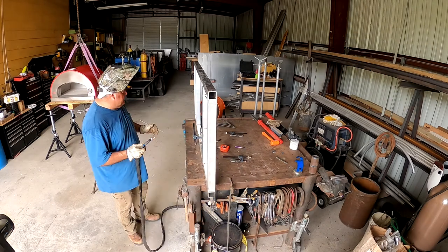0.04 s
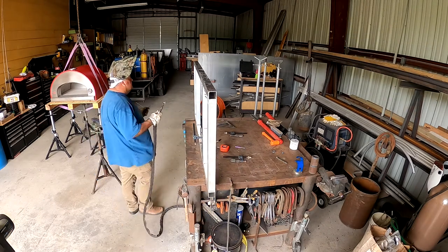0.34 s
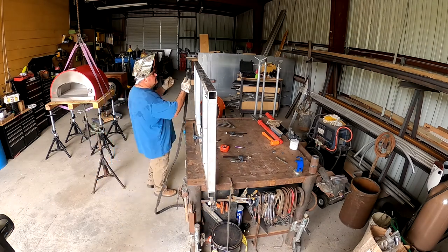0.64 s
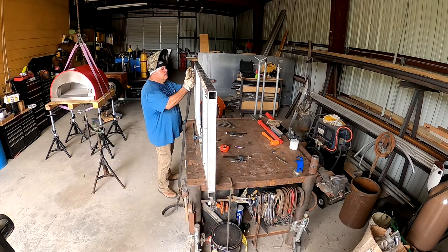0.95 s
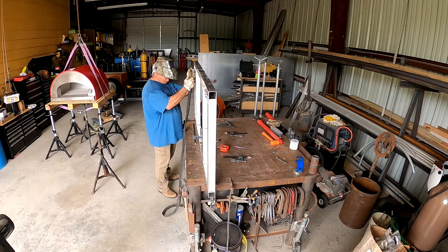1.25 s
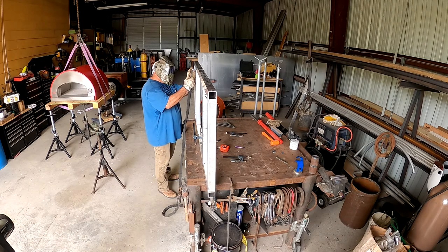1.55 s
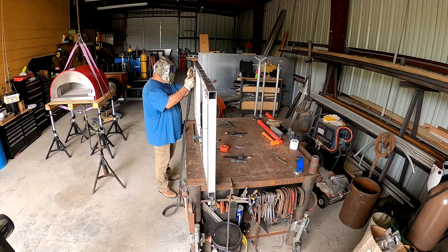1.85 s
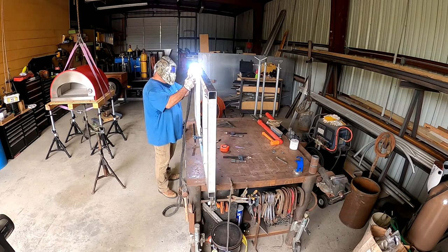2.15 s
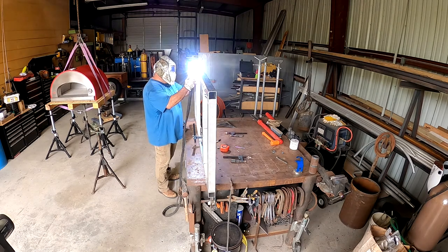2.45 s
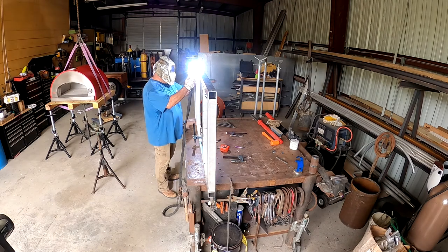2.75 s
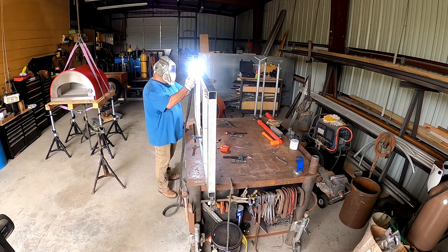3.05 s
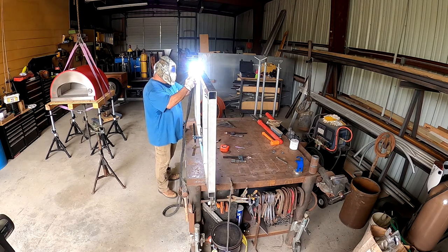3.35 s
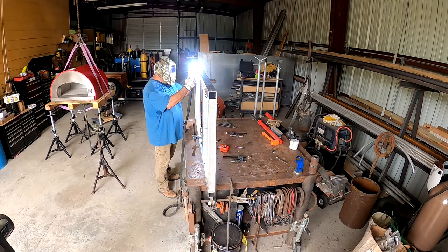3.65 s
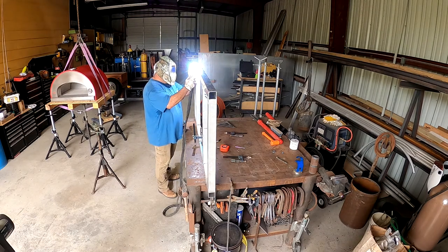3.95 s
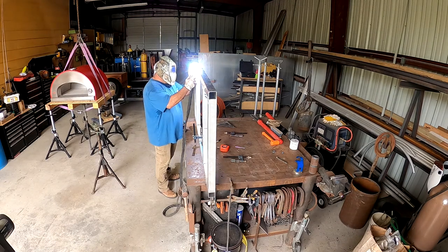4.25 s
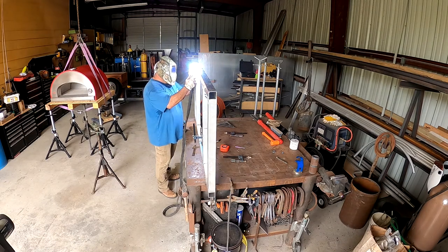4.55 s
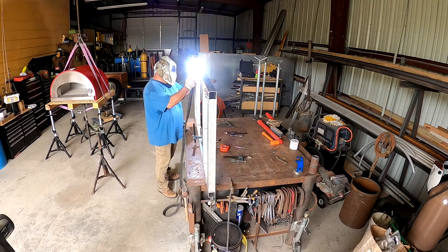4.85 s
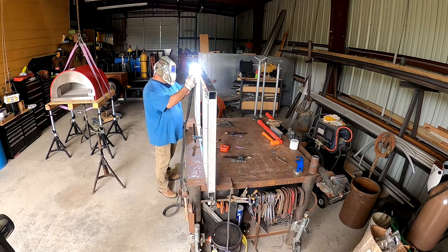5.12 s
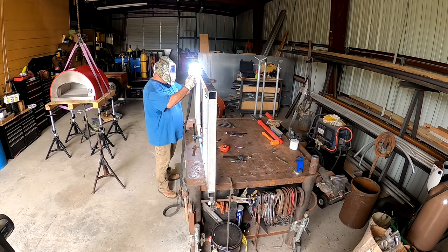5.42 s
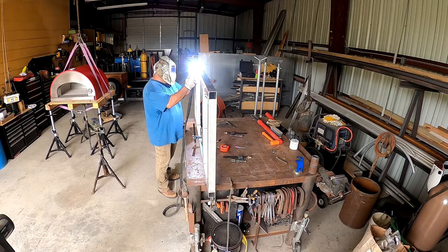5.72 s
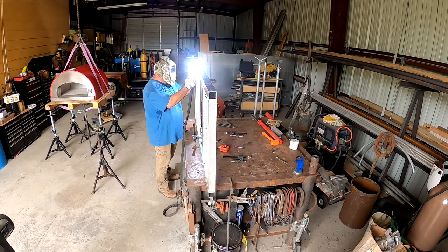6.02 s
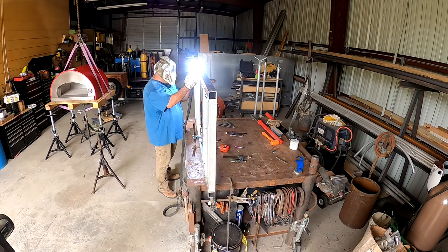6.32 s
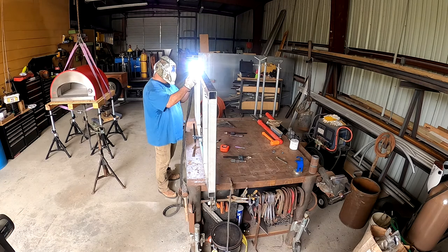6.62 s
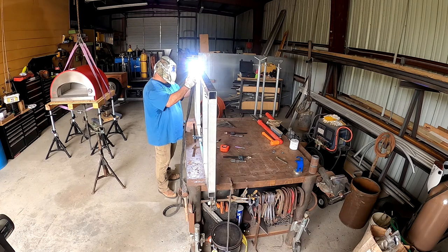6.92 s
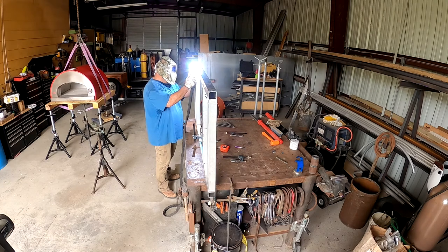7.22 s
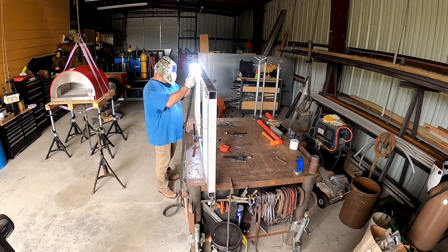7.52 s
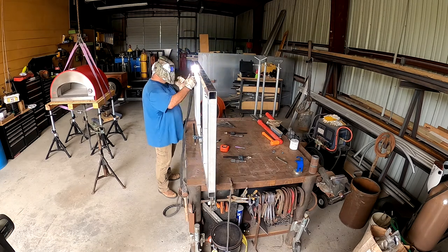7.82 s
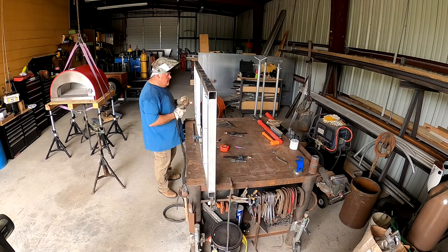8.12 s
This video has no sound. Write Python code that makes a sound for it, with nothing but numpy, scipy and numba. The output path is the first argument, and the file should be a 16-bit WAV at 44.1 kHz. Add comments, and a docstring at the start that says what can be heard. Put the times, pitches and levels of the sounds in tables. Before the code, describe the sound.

Machine fans drone, gas hisses softly, and a welding arc buzzes and sizzles steadily on metal for about six seconds.

```python
"""A bright, sizzling buzz over droning fans: AC TIG welding on a metal frame in a steel shed.
Shielding gas hisses, the arc strikes small and swells with the pedal; each polarity cycle pumps the
plasma and blasts off oxide. Echoes colour the buzz as the torch creeps along the seam. The torch lifts,
the arc dies, the gas spits once. A camera's gain control, a few metres off, ducks the fans under the arc."""
import sys
import numpy as np
from scipy import signal
from scipy.fft import rfft, irfft, next_fast_len
from scipy.io import wavfile
from scipy.ndimage import uniform_filter1d
from numba import njit

SR = 44100
rng = np.random.default_rng(int(sys.argv[2]) if len(sys.argv) > 2 else 0)


def generate_wav(signal):
    """Clip the signal to [-1, 1] and save it as 16-bit WAV at the path in sys.argv[1]."""
    frames = np.transpose(np.atleast_2d(signal))
    scaled = np.clip(frames, -1, 1) * 32767
    pcm = np.round(scaled).astype(np.int16)
    wavfile.write(sys.argv[1], SR, pcm)


N = 360297
TIME = np.arange(N) / SR
ARC_HZ = 390.0  # inverter's polarity cycle
ARC_ON_S, ARC_OFF_S = 2.027, 7.9


def undb(db):
    """Decibels to gain."""
    return 10 ** (np.asarray(db) / 20)


def pan(left_db):
    """Left and right gains for a level difference."""
    return undb(np.array([[left_db], [-left_db]]) / 2)


def since(start_s):
    """Seconds since start_s, 0 before it."""
    return np.maximum(TIME - start_s, 0)


def ramp(middle_s, length_s):
    """Linear move from 0 to 1."""
    return np.clip((TIME - middle_s) / length_s + .5, 0, 1)


def walk(rate_hz):
    """Random steps at rate_hz, smoothed twice; standard deviation 1."""
    hold = int(SR / rate_hz)
    held = np.repeat(rng.standard_normal(N // hold + 2), hold)[rng.integers(hold):]
    smooth = uniform_filter1d(uniform_filter1d(held, hold), hold)[:N]
    return smooth / smooth.std()


def drift(t_s, rate_hz):
    """Wandering complex gain per channel, rms near 1."""
    knots = rng.standard_normal((4, 1000))
    parts = np.array([np.interp(t_s * rate_hz, np.arange(len(row)), row) for row in knots])
    return (parts[:2] + 1j * parts[2:]) * np.sqrt(3 / 4)


def colour(x, curve):
    """Filter by (f/Hz, gain/dB) points on a log-frequency axis."""
    hz, db = np.transpose(curve)
    size = next_fast_len(N, real=True)
    bin_hz = np.maximum(np.arange(size // 2 + 1) * SR / size, 1)
    gain = undb(np.interp(np.log(bin_hz), np.log(hz), db))
    return irfft(rfft(x, size) * gain, size)[..., :N]


def echoes(x, share=0.38, decay_s=0.027, above_hz=550, taps=4000):
    """Early echoes off floor, bench and walls ripple the spectrum above the bass."""
    tail = rng.standard_normal(taps) * np.exp(-np.arange(taps) / (decay_s * SR))
    tail = signal.sosfilt(signal.butter(2, above_hz, "high", fs=SR, output="sos"), tail)
    return x + share * signal.fftconvolve(x, tail / np.linalg.norm(tail))[:N]


def shed_noise(spectrum):
    """Coloured noise with the shed's echoes, rms 1."""
    x = colour(echoes(rng.standard_normal(N)), spectrum)
    return x / x.std()


def fans(tones_db=-0.16, air_db=-36.5, wander=.0008, waver_db=1.33, jitter_rad=0.14, gust_db=0.82):
    """Cooling fans and pump drone over rushing air; nearly equal speeds beat."""
    # per rotor: f/Hz, [(harmonic, level/dB)]
    rotors = [ (209.1, [(1, -51.2), (2, -43.3), (3, -56), (4, -46), (5, -58), (6, -47), (8, -54),
              (10, -53)]), (211.1, [(1, -68), (5, -59), (6, -49), (12, -54), (18, -60), (24, -57.5)]),
              (175.5, [(4, -46), (5, -51)]), (361.6, [(1, -57), (2, -52), (5, -54), (12, -63)]), ]
    # air rush: f/Hz, level/dB
    air_spectrum = [(25, -33), (60, -21.5), (120, -17), (168, 0.5), (235, -10), (355, 4.5), (500, -0.5),
                    (660, 0), (760, 2), (1200, -5), (2300, -8.5), (3100, -7), (4500, -14), (10000, -19.5),
                    (15500, -30.5)]
    # its stereo width: f/Hz, side minus mid/dB
    air_width = [(40, -34), (150, -14.5), (350, -27), (1000, -15.5), (3000, -8.5), (8000, -4), (15000, -2)]
    tones = np.zeros(N)
    for hz, harmonics in rotors:
        angle = 2 * np.pi * np.cumsum(hz * (1 + wander * walk(1.5))) / SR
        for order, db in harmonics:
            phase = order * angle + jitter_rad * walk(20) + rng.uniform(0, 2 * np.pi)
            tones += np.sqrt(2) * undb(db + waver_db * walk(9)) * np.sin(phase)
    mid = shed_noise(air_spectrum)
    side = colour(shed_noise(air_spectrum), air_width) * np.array([[1], [-1]])
    air = (mid + side) * undb(air_db + gust_db * walk(6))
    return (undb(tones_db) * tones + air) * pan(left_db=.5)


def torch_noise(spectrum, side_db=-3.5):
    """Wide hiss, slightly left; the shed's echoes make the channels differ."""
    side = undb(side_db) * shed_noise(spectrum) * np.array([[1], [-1]])
    return (shed_noise(spectrum) + side) * pan(left_db=1.8)


def gas(valve_s=1.722, surge_db=-45.5, surge_decay_s=.32, steady_db=-57):
    """Argon hisses from the torch cup: opening surge, steady flow, one spit after the arc."""
    # gas hiss: f/Hz, level/dB
    spectrum = [(500, -20), (4000, -4), (7500, 0), (11000, -1.5), (15000, -1)]
    # spit: t/s, level/dB, decay/s
    spits = [(7.99, -39, 0.019)]
    surge = undb(surge_db) * np.exp(-since(valve_s) / surge_decay_s)
    flow = (TIME > valve_s) * (undb(steady_db) + surge)
    for start_s, db, decay_s in spits:
        flow += undb(db) * (TIME > start_s) * np.exp(-since(start_s) / decay_s)
    return torch_noise(spectrum) * flow


def welder():
    """The welder's moves, 0 to about 1: pedal, travel along the seam, brief lean, torch lift."""
    pedal = ramp(middle_s=2.305, length_s=0.24)
    along = since(ARC_ON_S) / (ARC_OFF_S - ARC_ON_S)
    lean_s, lean_half_s = 6.53, .28
    lean = np.exp(-((TIME - lean_s) / lean_half_s) ** 2)
    lift = ramp(middle_s=7.77, length_s=0.083)
    return np.array([pedal, along, lean, lift])


def arc_envelope(attack_s=0.026, fall_db_per_s=240):
    """The arc lights, holds and dies away in the shed."""
    return (1 - np.exp(-since(ARC_ON_S) / attack_s)) * undb(-fall_db_per_s * since(ARC_OFF_S))


def sizzle(base_db=-35.5, low_current_db=-1, seam_heat_db=1, depth=0.22, flutter_db=.6):
    """Oxide is blasted off the metal in the cleaning half of each cycle."""
    # oxide hiss: f/Hz, level/dB
    spectrum = [(300, -20), (2000, -6), (4000, -4.5), (6000, -2.5), (8000, .5), (10500, -3.5),
                (13000, -2.5), (15000, -1.5)]
    cycle = 1 + depth * np.cos(2 * np.pi * ARC_HZ * TIME)
    hiss = torch_noise(spectrum) * cycle / np.sqrt(np.mean(cycle ** 2))
    pedal, along, _, _ = welder()
    level_db = base_db + low_current_db * (1 - pedal) + seam_heat_db * along
    return hiss * arc_envelope() * undb(level_db + flutter_db * walk(70))


def standing_wave_db(hz, along, lean, scatter_hz=10500):
    """Reflections boost or cancel a partial as the torch moves; above scatter_hz they scatter instead."""
    # off frame and bench: extra path/m, share, change along seam/m, change in lean/m
    reflections = [(.3835, .28, -.0289, .0047), (.5515, .38, -.0206, -.007), (.5713, .44, -.009, .01),
                   (.7386, .53, .0105, -.0056)]
    wavelength_m = 343 / hz
    reflected = sum(share * np.exp(2j * np.pi * (path_m + creep_m * along + lean_m * lean) / wavelength_m)
                    for path_m, share, creep_m, lean_m in reflections)
    coherent = reflected / (1 + (hz / scatter_hz) ** 6)
    db = 10 * np.log10(np.abs(1 + coherent) ** 2 + .02)
    return db - db[along > 0].mean()


def buzz(gain_db=0.65, flutter_db=0.29, settle_s=.05, thin_db=-9, thin_below_hz=5400):
    """Each polarity cycle pumps the plasma: a harmonic stack, scattered by the shed to two mic ports."""
    # arc partials: harmonic, level/dB
    partials = [(1, -53), (2, -53), (3, -80), (4, -48.5), (5, -55), (6, -42), (7, -37), (8, -76), (9, -66),
                (10, -34), (11, -40.5), (12, -35), (13, -34), (14, -42), (15, -51), (16, -43), (17, -40),
                (18, -47.5), (19, -36.5), (20, -40.1), (21, -43.5), (22, -53), (23, -44.5), (24, -46),
                (25, -51), (26, -61), (27, -61), (28, -59.5), (29, -46), (30, -50.5), (31, -55.7),
                (32, -50), (33, -59), (34, -57.9), (35, -52), (36, -61), (37, -51), (38, -49), (39, -65),
                (40, -66)]
    # response to arc size: f/Hz, slope/(dB per dB)
    size_response = [(400, 0.5), (2340, 1.2), (2730, 0.26), (3510, .2), (3900, 1.17), (4290, .45),
                     (4700, 0), (5100, 0.1), (6500, -.1), (7700, 0.18), (9000, -.1), (14800, 0.1),
                     (15200, -.75)]
    # mic ports: f/Hz, left minus right/dB, right lead/rad
    ports = [(2440, 1.5, 0.071), (3880, 3.5, 0.39), (4700, 3, 0.91), (5200, 3, 1.43), (6090, 13, 0.83),
             (6720, 0.5, 0.16), (7500, 5.5, 0.4), (11000, 6, .2)]
    port_hz, port_db, port_rad = np.transpose(ports)
    step = 64  # samples per control value
    control_s = TIME[::step]
    pedal, along, lean, lift = welder()[:, ::step]
    start_db, full_db, lifted_db = -15, 1, -8  # arc size
    size_db = start_db + (full_db - start_db) * pedal + (lifted_db - full_db) * lift
    struck = np.exp(-since(ARC_ON_S)[::step] / settle_s)
    dance = .11 + .7 * struck + .8 * lift  # unsteady share: the arc's root dances on the metal
    # clear of the metal, notches fill to the level of their neighbours
    even_db = 10 * np.log10(uniform_filter1d(undb(np.array(partials)[:, 1]) ** 2, size=3))

    stack = np.zeros((2, N))
    fundamental, carrier = np.exp(2j * np.pi * ARC_HZ * TIME), np.ones(N, complex)
    for (order, db), filled_db in zip(partials, even_db):
        hz = order * ARC_HZ
        level_db = (1 - lift) * (db + standing_wave_db(hz, along, lean)) + lift * max(db, filled_db)
        # a large arc moves enough air for the low harmonics; a newly struck one is thin
        level_db += size_db * np.interp(hz, *np.transpose(size_response))
        level_db += struck * thin_db / (1 + (hz / thin_below_hz) ** 12)
        lead_rad = np.interp(hz, port_hz, port_rad) * np.array([[-.5], [.5]])
        direct = pan(np.interp(hz, port_hz, port_db)) * np.exp(1j * lead_rad)
        direct = direct * (1 + dance * drift(control_s, rate_hz=28)[0]) / np.hypot(1, dance)
        # far echoes sway with the welder's body, short waves most
        far_share = .38 * (hz / 9000) ** 2
        field = (direct + far_share * drift(control_s, rate_hz=9)) / np.hypot(1, far_share)
        # near echoes off the frame smear each pulse
        smear_rad = 1.38 * hz / 5000 * rng.standard_normal()
        field = field * undb(level_db) * np.exp(1j * smear_rad)
        carrier = carrier * fundamental
        stack += np.sqrt(2) * (np.repeat(field, step, axis=1)[:, :N] * carrier).imag
    return stack * arc_envelope() * undb(gain_db + flutter_db * walk(35))


def scene():
    """Arc and gas over the running fans."""
    return buzz() + sizzle() + gas() + fans()


@njit
def follow(x, attack_s, release_s):
    """One-pole follower with separate rise and fall times."""
    y, level = np.empty(len(x)), 0.
    for i in range(len(x)):
        level += (x[i] - level) / (SR * (attack_s if x[i] > level else release_s))
        y[i] = level
    return y


def record(dry):
    """The camera turns its gain down while the sound is loud, then cuts the top."""
    threshold_db, slope, top_hz = -32, 0.76, 15740
    power = uniform_filter1d(np.mean(dry ** 2, axis=0), size=900)
    over_db = np.maximum(10 * np.log10(power + 1e-12) - threshold_db, 0)
    cut_db = follow(slope * over_db, attack_s=.05, release_s=.16)
    low_pass = signal.ellip(12, .1, 80, top_hz, fs=SR, output="sos")
    return signal.sosfilt(low_pass, dry * undb(-cut_db))


dry = scene()
out = record(dry)
generate_wav(out)
```